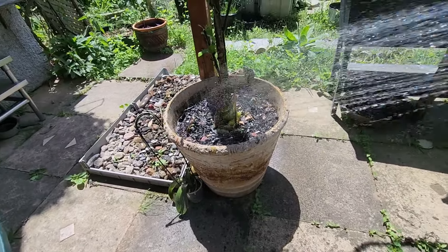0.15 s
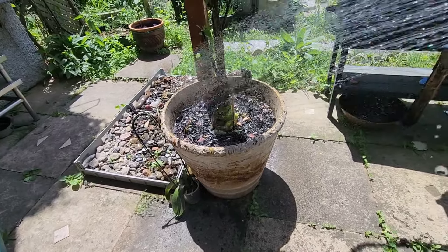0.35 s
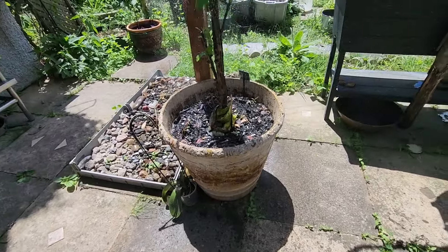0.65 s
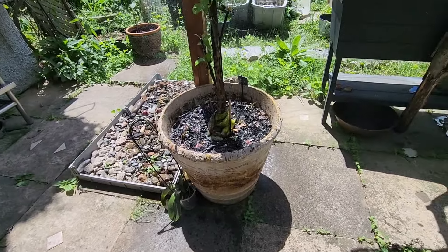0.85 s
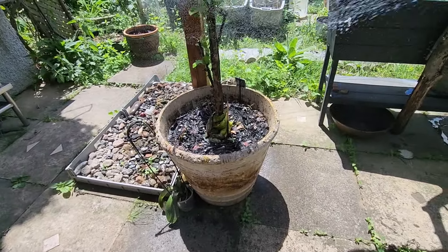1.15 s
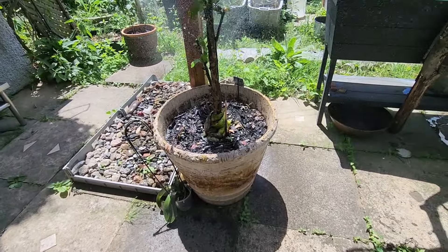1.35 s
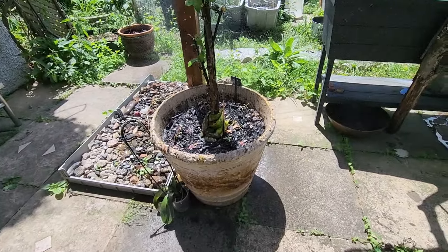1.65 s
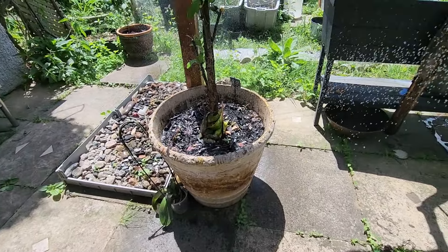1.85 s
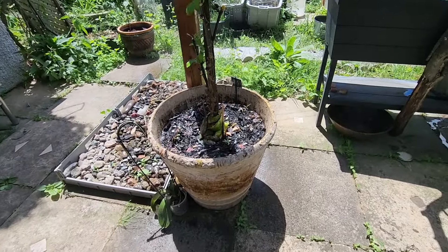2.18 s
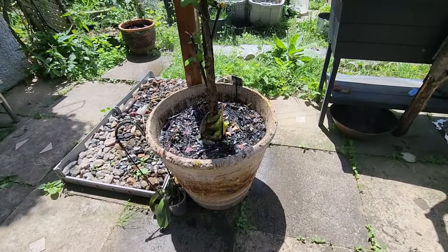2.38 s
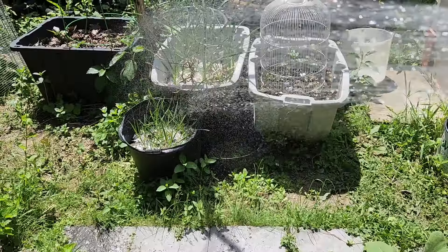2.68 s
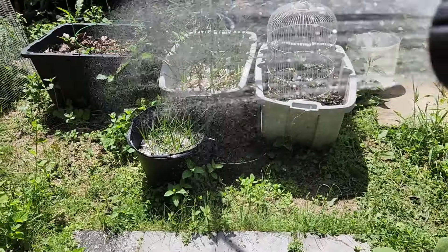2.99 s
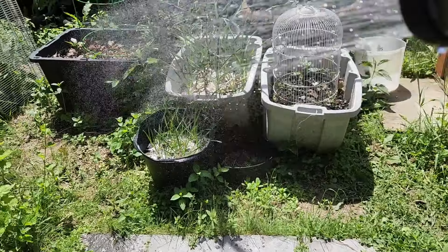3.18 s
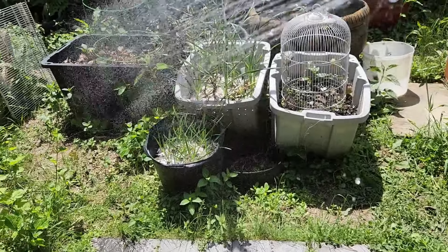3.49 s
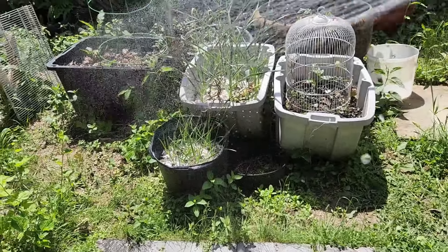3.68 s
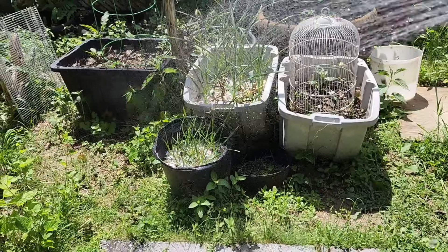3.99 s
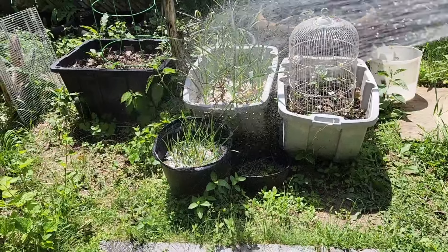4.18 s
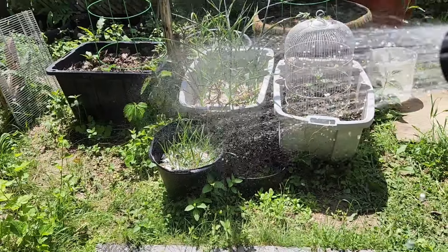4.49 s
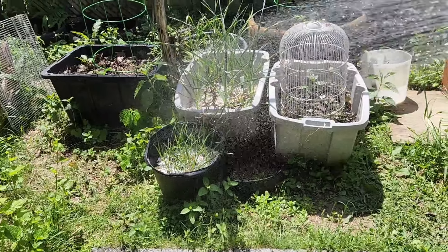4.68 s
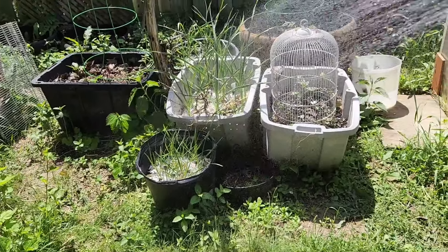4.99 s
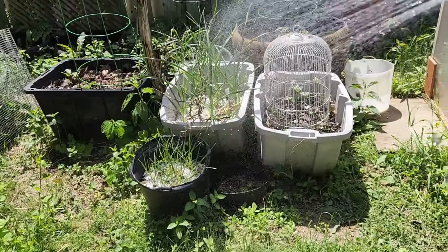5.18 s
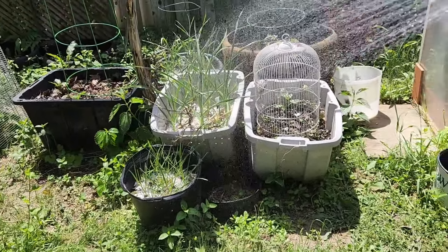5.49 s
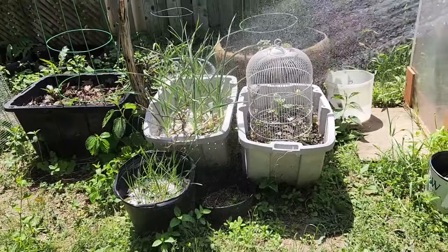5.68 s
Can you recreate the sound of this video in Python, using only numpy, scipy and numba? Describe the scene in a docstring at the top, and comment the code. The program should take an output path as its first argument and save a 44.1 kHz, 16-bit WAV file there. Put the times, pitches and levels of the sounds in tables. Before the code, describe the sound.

A hand-held hose nozzle sprays close to the microphone, a little to the right: dense, bright, slightly sputtering hiss, with droplets pattering dully on pots, soil and leaves. Beneath it lie a faint, slowly rising hose whistle, low yard rumble, a distant engine drone and machine hums. At 1.6 s the trigger is released with a sharp double click and the jet falls away. Soft low hand knocks bump at 1.75-1.9 s while a thin, very bright leak hisses with rising whistles until 2.05 s. Small crisp clicks and drips follow from 2.1 to 2.5 s over the quiet rumble. A total silence of about 0.05 s marks a cut. At 2.56 s spraying resumes abruptly in another spot, strongest near 3.1 s, when drops drum on tubs. The hiss shifts in colour and direction as the nozzle turns, with muffled knocks at 4.3 and 5.4 s, and continues to the end near 5.85 s.

```python
"""A hand-held hose nozzle hisses close to the right of two ports (noise and drop impacts, a moving hump) and its
spray patters on pots and leaves, over a soft hose whistle, drips, rumble, an engine and machine hums.
At 1.6 s the trigger is let go: clicks (cracks and rings), hand knocks (low sines), a short bright leak
(high-passed turbulence with two rising whistles). After a short silence at 2.5 s the spraying goes on
elsewhere in the yard to the end, with two more knocks."""
import sys
import numpy as np
from scipy import signal
from scipy.fft import rfft, irfft, next_fast_len
from scipy.io import wavfile
from scipy.ndimage import map_coordinates
from numba import njit

SR = 44100
rng = np.random.default_rng(int(sys.argv[2]) if len(sys.argv) > 2 else 0)


def generate_wav(sig):
    """Save sig (samples, or channels by samples) to the path in sys.argv[1] as 16-bit PCM at SR."""
    pcm = np.round(np.clip(np.atleast_2d(sig).T, -1, 1) * 32767).astype(np.int16)
    wavfile.write(sys.argv[1], SR, pcm)


N = 257984
T_S = np.arange(N) / SR
FFT_LEN = next_fast_len(N, True)
BINS_HZ = np.maximum(np.arange(FFT_LEN // 2 + 1) * SR / FFT_LEN, 1)

SILENCE_START_S, SILENCE_END_S = 2.509, 2.5585
RELEASE_S = 1.605   # the trigger is let go

# bearing of the nozzle: t/s, lag of the left port/ms
BEARING = [(0, .4), (.5, .37), (.85, .29), (1.2, .36), (1.45, .3), (1.9, .4), (2.55, .315), (3.1, .24),
           (3.4, .172), (3.58, .155), (3.95, .245), (4.3, .215), (4.7, .25), (5.3, .2), (5.85, .24)]
# the two places: close echo/gain, spray landing all around/power share, rumble level/dB, engine level/dB
PLACES = [(.02, 0.85, -47, -50.5), (.44, 0.75, -48, -49.5)]


def from_db(db):
    """Decibels to gain."""
    return 10 ** (np.asarray(db) / 20)


def rms_one(x):
    """Scales to rms 1."""
    return x / np.sqrt(np.mean(np.square(x)) + 1e-20)


def in_time(rows):
    """Each column of a curve table, one value a sample."""
    s, *columns = np.transpose(rows)
    return [np.interp(T_S, s, column) for column in columns]


def by_place(first, second):
    """One value up to the end of the silence, another after it."""
    return np.where(T_S < SILENCE_END_S, first, second)


def bump(s, half_s):
    """A triangle of height 1 around a moment, half_s to each side."""
    return np.clip(1 - abs(T_S - s) / half_s, 0, 1)


def after_release():
    """Seconds since the trigger was let go; 0 in the second place."""
    return by_place(np.maximum(T_S - RELEASE_S, 0), 0)


def drift(corner_hz):
    """Slow chance of spread 1: noise through a double one-pole low-pass at SR / 40."""
    r = np.exp(-80 * np.pi * corner_hz / SR)
    slow = signal.lfilter([1], [1, -2 * r, r * r], rng.standard_normal(N // 40 + 2002))
    slow = rms_one(slow[2000:])
    return np.interp(np.arange(N) / 40, np.arange(len(slow)), slow)


def band_pass(order, low_hz, high_hz):
    """Butterworth band-pass sections."""
    return signal.butter(order, [low_hz, high_hz], "band", fs=SR, output="sos")


def through(x, response):
    """Filters steady noise by a frequency response."""
    return irfft(rfft(x, FFT_LEN) * response, FFT_LEN)[..., :N]


def at_bins(points):
    """A spectrum table read at every FFT bin, linear over log frequency."""
    hz, values = np.transpose(points)
    return np.interp(np.log(BINS_HZ), np.log(hz), values)


def colour(x, points):
    """Filters steady noise by a spectrum table in dB."""
    return through(x, from_db(at_bins(points)))


def late(x, ms):
    """Reads x late by a changing delay."""
    return map_coordinates(x, [np.arange(N) - ms * SR / 1000], order=3, mode="nearest")


@njit
def resonate(x, hz, width_hz, sr):
    """A two-pole resonance whose centre moves."""
    out, r = np.zeros(len(x)), np.exp(-np.pi * width_hz / sr)
    for i in range(2, len(x)):
        fed_back = 2 * r * np.cos(2 * np.pi * hz[i] / sr) * out[i - 1] - r * r * out[i - 2]
        out[i] = x[i] - x[i - 2] + fed_back
    return out


def spread(x, pan_db):
    """Pans a pair of channels by a left minus right level difference."""
    half_db = np.atleast_1d(pan_db) / 2
    return x * from_db(np.array([half_db, -half_db]))


def stereo_noise():
    """White noise, alike at both ports in the bass and unlike in the treble."""
    # f/Hz, left-right correlation
    likeness = [(40, .8), (70, .78), (130, .8), (300, .76), (700, .35), (1300, .08), (15000, 0)]
    alike = np.clip(at_bins(likeness), 0, 1)
    mid, side = rng.standard_normal((2, N))
    return through(mid, np.sqrt(1 + alike)) + through(side, np.sqrt(1 - alike)) * [[1], [-1]]


def turbulence(drops_per_s, size_db, drop_share, flutter_db):
    """Smooth hiss mixed with dense drop impacts of uneven size; the flow flutters; rms 1."""
    sizes = from_db(size_db * np.minimum(rng.exponential(1, N), 4)) * rng.choice([-1, 1], N)
    drops = rms_one(sizes * (rng.random(N) < drops_per_s / SR))
    share = np.clip(drop_share, 0, 1)
    water = np.sqrt(1 - share) * rng.standard_normal(N) + np.sqrt(share) * drops
    return rms_one(water * from_db(flutter_db * drift(26)))


def port(x, points, notch):
    """One port: a reflection off hand and body, a notch that wanders slowly at random, a fixed colour."""
    hz, width_hz, depth, wander_hz = notch
    x = x + 0.26 * late(x, 1.292 + 0.071 * drift(1.36))   # delay and wander in ms
    unit_gain = (1 - np.exp(-2 * np.pi * width_hz / SR)) / 2
    rung = resonate(x, hz + wander_hz * drift(2.1), width_hz, SR)
    return colour(x - np.clip(depth, 0, 1) * unit_gain * rung, points)


def at_ports(near, around):
    """The nozzle reaches the right port first; splashes differ at each port, more so in the treble."""
    # port colour for nozzle sound: f/Hz, gain/dB
    left_colour = [(300, -28), (900, -6.5), (2000, -0.5), (3400, 0), (4500, -1), (6500, -2), (7400, -1.5),
                   (8200, -7), (9100, -1), (10200, 0.5), (11000, -0.5), (13800, -4.5), (14600, 2),
                   (16000, -4)]
    # port colour for nozzle sound: f/Hz, gain/dB
    right_colour = [(300, -23), (900, -5.5), (2000, 3), (3400, 2), (4000, 2), (4700, 5.5), (6400, 2),
                    (7400, 8), (8400, 1), (9400, -4), (10300, 4.5), (11000, -3), (11900, 3), (12600, 1),
                    (15000, -0.5)]
    # notch at the left, then the right port: f/Hz, width/Hz, depth (0-1), wander/Hz
    notches = [(8300, 1050, 0.85, 300), (9180, 1360, 0.9, 400)]
    echo_ms, echo_turns, echo_wander_ms = .785, .31, 0.023
    facing_ms, narrowing_per_ms = 0.21, 5.3

    lag_ms, = in_time(BEARING)
    echo, wide = np.clip([by_place(PLACES[0][k], PLACES[1][k]) for k in range(2)], 0, 1)
    # facing the ports, the nozzle drowns the spray around
    wide = np.clip(wide - narrowing_per_ms * np.maximum(facing_ms - lag_ms, 0), 0, 1)
    around = through(around, np.sqrt(1 / (1 + (4800 / BINS_HZ) ** 2)))
    both = np.sqrt(1 - wide) * np.array([late(near, lag_ms), near]) + np.sqrt(wide) * around

    # a close surface returns the lower treble with a turn of phase and combs it
    bounce = np.exp(-2j * np.pi * (BINS_HZ * echo_ms / 1000 + echo_turns))
    bounce = bounce / (1 + (BINS_HZ / 5300) ** 4) / (1 + (1500 / BINS_HZ) ** 4)
    echoes = [late(side, echo_wander_ms * drift(1.9)) for side in through(both, bounce)]
    left, right = both + echo * np.array(echoes)
    return np.array([port(left, left_colour, notches[0]), port(right, right_colour, notches[1])])


def yard():
    """Steady yard noise: coloured noise, bass common to both ports."""
    # f/Hz, relative level/dB
    spectrum = [(25, -11.5), (55, -4), (130, -18), (200, -17.5), (400, -21), (1000, -24), (2000, -30.5),
                (4000, -33.5), (7500, -39.5), (9500, -44), (13000, -36.5), (15500, -38.5)]
    return from_db(-46.5) * rms_one(np.array([colour(side, spectrum) for side in stereo_noise()]))


def rumble_and_engine():
    """Lumpy traffic and wind rumble and a far engine drone: two bands of noise that swell."""
    # t/s, rise/dB, half length/s
    swells = [(1.005, 8, 0.078), (1.435, 7, 0.2), (1.904, 7, 0.39), (2.36, 7, 0.24), (4.32, 10.5, 0.17),
              (4.8, 4.5, 0.55), (5.406, 7.5, 0.14), (5.738, 8.5, 0.15)]
    swell_db = sum(db * bump(s, half_s) for s, db, half_s in swells)
    rumble_db = by_place(PLACES[0][2], PLACES[1][2]) + swell_db + 0.58 * drift(4.0)
    # share of a swell the drone follows; in the second place it sinks instead
    engine_db = by_place(PLACES[0][3], PLACES[1][3]) + by_place(0.33, -0.33) * swell_db
    rumble = rms_one(signal.sosfilt(band_pass(2, 38.5, 86.4), stereo_noise()))
    engine = rms_one(signal.sosfilt(band_pass(2, 96.7, 126.4), stereo_noise()))
    return from_db(rumble_db) * rumble + from_db(engine_db) * engine


def hums():
    """Machine hums: sines that waver in pitch and level."""
    # start/s, end/s, f/Hz, rms wander/Hz, rms level/dB
    hum_tones = [(0, 2.52, 119, 1.2, -47), (0, 2.52, 157, 1.2, -54), (0, 2.52, 134, 1, -56),
                 (2.55, 5.85, 226.5, .6, -60), (2.55, 5.85, 53.8, .8, -51), (2.55, 3.55, 161.5, .6, -59),
                 (2.55, 3.55, 134, .6, -58), (3.55, 4.5, 103, 1.2, -47), (4.5, 5.85, 107, 1.2, -50),
                 (2.8, 3.5, 322, .8, -63), (5.1, 5.6, 287, .8, -62)]
    out = np.zeros(N)
    for start, end, hz, wander_hz, level_db in hum_tones:
        tone = np.sin(2 * np.pi * np.cumsum(hz + wander_hz * drift(2.38)) / SR)
        gain = np.sqrt(2) * from_db(level_db + 1.0 * drift(2.5))
        out += gain * tone * (T_S >= start) * (T_S < end)
    return out


def whistle():
    """Water column singing in the hose: noise twice through a rising resonance, nearer the right."""
    # each place: first f/Hz, rise/(Hz/s), level/dB
    song = [(535, 21, -52.5), (596.5, 18.6, -55)]
    fade_db_per_s = 70.0
    first_hz, rise_hz_per_s, level_db = [by_place(*column) for column in zip(*song)]
    hz = first_hz + rise_hz_per_s * (T_S - by_place(0, SILENCE_END_S))
    once = resonate(rng.standard_normal(N), hz, 110.0, SR)
    tone = rms_one(resonate(once, hz, 110.0, SR))
    level_db = level_db - fade_db_per_s * after_release() + 1.1 * drift(0.69) + 0.8 * drift(7.4)
    lag_ms, = in_time(BEARING)
    return spread(np.array([late(tone, lag_ms), tone]), -1.5) * from_db(level_db)


def drips():
    """Wet leaves near the hose drip: sparse drops over a thin trickle, their own on each side."""
    water = [turbulence(150, 4.0, 0.25, 3.0) for side in "LR"]
    drops = signal.sosfilt(band_pass(1, 1800.0, 8000.0), water)
    return spread(rms_one(drops), -3) * from_db(-61)


def splash():
    """Drops drum on soil, leaves and tub walls: a dull patter on each side; it outlasts the jet."""
    # spray sweeps over a tub: t/s, rise/dB
    passes = [(.15, 8), (1.5, 4), (2.6, 4), (3.1, 10.5), (3.92, 8.5), (4.7, 7.5)]
    base_db, pass_half_s, fade_db_per_s = -57, 0.47, 45
    level_db = base_db + sum(db * bump(s, pass_half_s) for s, db in passes)
    level_db = level_db - fade_db_per_s * after_release()
    water = [turbulence(1500, 3.5, 0.62, 3.9) for side in "LR"]
    drops = signal.sosfilt(band_pass(1, 330, 1900), water)
    return rms_one(drops + 0.57 * drops[::-1]) * from_db(level_db)


def knocks():
    """Hand knocks the microphone body: low sines that swell for a few milliseconds and die."""
    # t/s, level before the soft onset/dB, f/Hz, t60/s
    thuds = [(1.743, -19.5, 94, 0.059), (1.771, -22.5, 240, 0.024), (1.806, -17, 113, 0.038),
             (1.888, -18, 88, 0.067), (4.299, -29, 90.7, 0.15), (5.38, -25, 104, 0.1)]
    out, t = np.zeros(N), np.arange(int(.15 * SR)) / SR
    for s, level_db, hz, t60_s in thuds:
        i = round(s * SR)
        envelope = from_db(level_db - 60 * t / t60_s) * (1 - np.exp(-t / 0.0046))
        out[i:i + len(t)] += envelope * np.sin(2 * np.pi * hz * t)
    return out


def clicks():
    """Trigger and dripping nozzle: a broad crack and a ring, the crack with a faint tail from walls."""
    # t/s, level before the onset/dB, ring f/Hz, left minus right/dB, crack gain/dB
    snaps = [(1.618, -20, 7340, -10, -2), (1.6189, -15, 4350, -6, 1), (2.0802, -34, 14200, -2.5, 1),
             (2.2069, -39, 7740, 0, 1), (2.2254, -32, 12600, 0, -2), (2.241, -38, 7710, -15, 0),
             (2.2653, -19, 12400, 1, -3), (2.2785, -25, 11600, 6, -5), (2.3045, -40, 12000, 0, 3),
             (2.336, -45, 6000, 0, -3), (2.3474, -41, 13100, -0.5, -4), (2.366, -35, 2600, -4, -3),
             (2.388, -42, 14500, 0, -6), (2.4004, -31, 14300, 0.0, -4), (2.405, -33, 13810, 3.0, -5),
             (2.408, -24, 14500, -1.0, -1), (2.4178, -38, 14200, -3.5, -4), (2.4216, -31, 12200, -6.0, -9),
             (2.464, -47, 9000, 0, -1), (2.4872, -39, 13500, -1, 2)]
    t60_s, rise_s, tail_db, tail_t60_s = .0042, .0005, -18.5, 0.12
    out, t = np.zeros((2, N)), np.arange(int(.08 * SR)) / SR
    fall = from_db(-60 * t / t60_s) * (1 - np.exp(-t / rise_s))
    tail = from_db(tail_db - 60 * t / tail_t60_s)
    for s, level_db, hz, pan_db, crack_db in snaps:
        noise = rng.standard_normal((2, len(t)))
        band = band_pass(1, max(2000, .6 * hz), min(1.8 * hz, 19000))
        crack = from_db(crack_db) * signal.sosfilt(band, noise) * (fall + tail)
        ring = np.sin(2 * np.pi * hz * t) * fall
        i = round(s * SR)
        out[:, i:i + len(t)] += spread(crack + ring, pan_db) * from_db(level_db)
    return out


def leak():
    """Water squeezed through the closing valve: thin, bright hiss with two rising whistles."""
    # the gap sings as it narrows: first f/Hz, rise/(Hz/s), gain/dB
    gap_tones = [(7350, 2500, -11.5), (11600, 2400, -2)]
    start_s, attack_s, end_s, release_s = 1.745, 0.013, 2.044, 0.0091
    base_db, burst_db, settle_s, sag_db_per_s = -41, 9, .035, 12
    age_s = np.clip(T_S - start_s, 0, 1)
    burst = burst_db * np.exp(-age_s / settle_s)
    level_db = base_db + burst - sag_db_per_s * age_s
    gate = np.clip(age_s / attack_s, 0, 1) ** 2 * np.clip((end_s - T_S) / release_s, 0, 1)
    bright = signal.butter(2, 8000, "high", fs=SR, output="sos")
    hiss = signal.sosfilt(bright, [turbulence(4900, 5.1, 0.23, 1.2) for part in range(3)])
    for first_hz, rise_hz_per_s, db in gap_tones:
        tone = resonate(rng.standard_normal(N), first_hz + rise_hz_per_s * age_s, 300, SR)
        hiss[0] += from_db(db - burst) * rms_one(tone)   # the whistles take no part in the burst
    return spread(at_ports(hiss[0], hiss[1:]), -6.5) * from_db(level_db) * gate


def patches(x, patchy_db):
    """Every narrow stretch of the hiss swells and sinks on its own."""
    place = np.clip(np.sqrt(BINS_HZ) / 8 - 3, 0, 13)
    spectrum, out = rfft(x, FFT_LEN), 0
    for k in range(14):
        stretch = irfft(spectrum * np.clip(1 - abs(place - k), 0, 1), FFT_LEN)[:N]
        out = out + stretch * from_db(patchy_db * (drift(3) + .6 * drift(14)))
    return out


def sputter():
    """Air and water at the mouth: lower-treble bursts of a few milliseconds, some tens a second."""
    bursts = from_db(8 * np.clip(drift(45), -2, 1.8))
    noise = signal.sosfilt(band_pass(2, 4000, 10500), rng.standard_normal(N) * bursts)
    return from_db(by_place(-8, -19)) * rms_one(noise)


def dip_or_swell(both):
    """Bands of the hiss dip or swell for a moment, by port."""
    # t/s, half length/s, f/Hz, width/Hz, left/dB, right/dB
    band_moves = [(.05, .15, 11500, 4000, 1.5, -1.5), (.35, 0.16, 4030, 600, -3, -8),
                  (.4, 0.17, 13600, 2500, -3, 3), (0.883, .2, 5630, 1800, -3, -2),
                  (.95, 0.19, 1700, 800, 0, -4), (1.2, 0.12, 13500, 3000, -1, 2.5),
                  (1.3, 0.52, 3200, 1200, 1.5, 0), (2.66, .15, 14500, 2000, 3, 6),
                  (3.145, 0.59, 3500, 696, 2.5, 1), (3.55, 0.28, 3320, 1000, 3, 3),
                  (4.35, 0.44, 3650, 700, 3, 2.5), (4.5, 0.26, 12000, 3000, 2, -3),
                  (5.0, .35, 1600, 800, -1.5, -2.5), (5.35, 0.27, 14600, 1500, 3, 4)]
    out = both.copy()
    for s, half_s, hz, width_hz, left_db, right_db in band_moves:
        part = slice(max(round((s - half_s) * SR), 0), round((s + half_s) * SR))
        band = band_pass(1, hz - width_hz / 2, hz + width_hz / 2)
        amount = np.minimum(2 * bump(s, half_s)[part], 1)
        gain = from_db(np.outer([left_db, right_db], amount))
        out[:, part] += (gain - 1) * signal.sosfiltfilt(band, both[:, part])
    return out


def hollow(both):
    """For a moment a narrow band loses what both ports share and sounds hollow and wide."""
    # t/s, half length/s, f/Hz, width/Hz, share of the common part removed (0-1)
    hollow_bands = [(.44, 0.081, 4020, 400, .8), (3.22, .08, 2750, 500, .85), (3.32, .08, 2950, 500, .9),
                    (3.41, .09, 3300, 1000, 0.73), (3.53, .13, 3400, 1200, 1), (3.65, .08, 3250, 900, .9),
                    (3.73, .06, 2750, 600, .8), (4.247, .08, 2600, 600, .6), (4.45, 0.093, 2660, 600, 0.64),
                    (5.14, 0.096, 2800, 600, 0.65), (5.45, 0.061, 2750, 400, 0.5),
                    (5.743, .1, 2920, 400, 0.6)]
    out = both.copy()
    for s, half_s, hz, width_hz, share in hollow_bands:
        part = slice(round((s - half_s) * SR), round((s + half_s) * SR))
        band = band_pass(2, hz - width_hz / 2, hz + width_hz / 2)
        common = signal.sosfiltfilt(band, out[:, part].mean(axis=0))
        out[:, part] -= np.clip(share, 0, 1) * np.minimum(2 * bump(s, half_s)[part], 1) * common
    return out


def jet():
    """Spray hiss with a hump that moves as the nozzle turns."""
    # each spraying: t/s, relative level/dB, tilt about 4 kHz (treble up, bass down)/dB, hump f/Hz, hump gain/dB
    sprayings = [
        [(0.0, -35, -1.5, 4770, -10), (0.36, -33.5, -3, 5600, 0.5), (0.68, -31.5, -1.8, 6170, -11.5),
         (0.77, -34, 0, 7600, -3), (0.97, -33.5, 0.5, 7950, -16), (1.15, -31, -1, 6200, -23),
         (1.56, -33.5, -1.5, 5810, -20), (1.71, -36, -1.5, 5930, -23), (1.76, -50.5, -9, 5770, -10),
         (2.1, -66, -1, 5800, -24)],
        [(2.556, -31, -1.5, 5670, -10), (3.0, -28.5, -1, 6400, -8.5), (3.16, -28, -1, 6000, -9),
         (3.29, -30.5, 2, 6360, -3.5), (3.45, -31.5, 0.5, 6650, 1.5), (4.0, -32, 0.4, 6740, -5),
         (4.31, -32, -0.5, 6240, -5), (4.56, -32.5, -2.5, 6200, -8), (4.88, -32, -1, 6460, -1.5),
         (5.25, -31, -2, 6650, -2.5), (5.85, -34, -1.5, 5870, -2)],
    ]
    level_db, tilt_db, hump_hz, hump_db = in_time(sprayings[0] + sprayings[1])
    lag_ms, = in_time(BEARING)
    near = patches(turbulence(5000, 3.6, .27, .8), patchy_db=1.6)
    around = np.array([patches(turbulence(3000, 3.7, .28, .9), patchy_db=1.9) for side in "LR"])
    both = at_ports(near, around)

    spits = turbulence(700, 5.2, 0.91, 1.9)   # trapped air bursts out at the nozzle mouth
    hump = from_db(hump_db) * rms_one(resonate(near + .7 * spits, hump_hz, 630.0, SR))
    hump = hump + sputter()
    both += [from_db(-20.5) * late(hump, lag_ms), hump]   # the far port lies in the shade
    both = dip_or_swell(both)

    low = signal.sosfilt(signal.butter(1, 4000, fs=SR, output="sos"), both)
    both = low * from_db(-tilt_db) + (both - low) * from_db(tilt_db)
    pan_db = 5.5 - 19.5 * lag_ms   # falls as the nozzle swings to the right
    spraying = sum((T_S >= rows[0][0]) & (T_S <= rows[-1][0]) for rows in sprayings)
    return hollow(spread(both, pan_db) * from_db(level_db) * spraying)


def scene():
    """All sources at the two ports."""
    background = yard() + rumble_and_engine() + hums()
    return background + whistle() + drips() + splash() + knocks() + clicks() + leak() + jet()


def record(dry):
    """A short silence parts the two places; a steep low-pass at 15.5 kHz cuts the top."""
    gate = np.clip(np.maximum(SILENCE_START_S - T_S, T_S - SILENCE_END_S) / 0.0011, 0, 1)
    low_pass = signal.ellip(14, .3, 75, 15500, fs=SR, output="sos")
    return signal.sosfilt(low_pass, dry * gate)


dry = scene()
out = record(dry)
generate_wav(out)
```